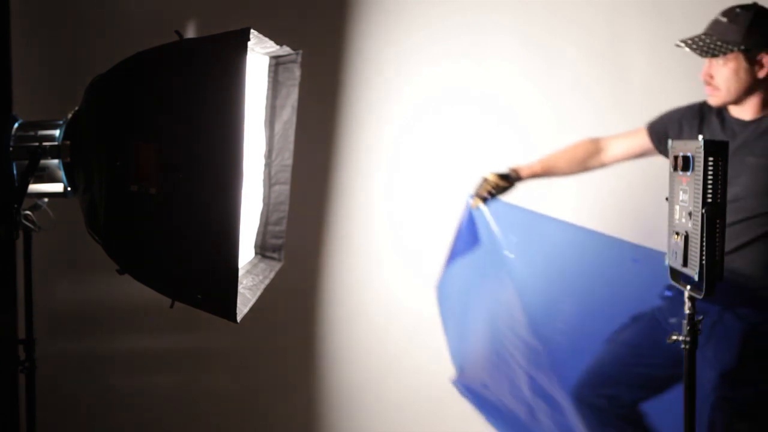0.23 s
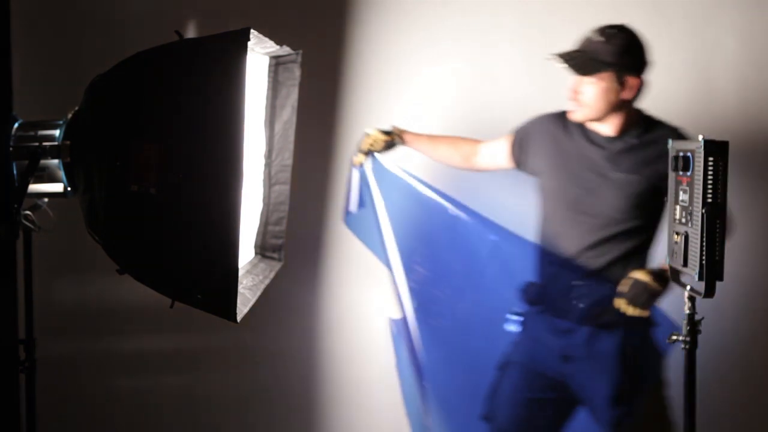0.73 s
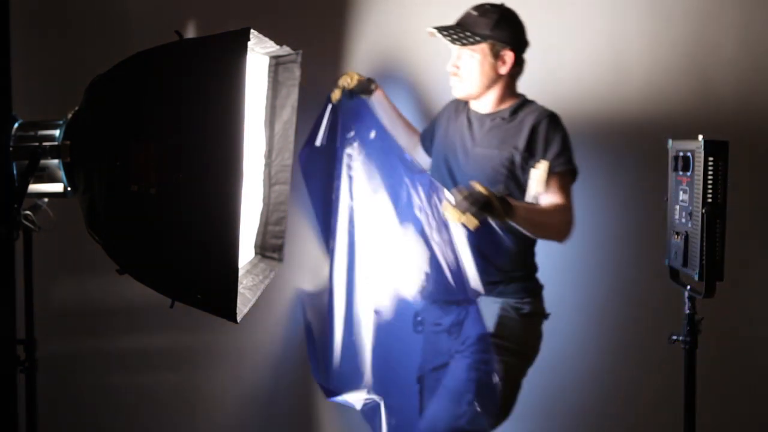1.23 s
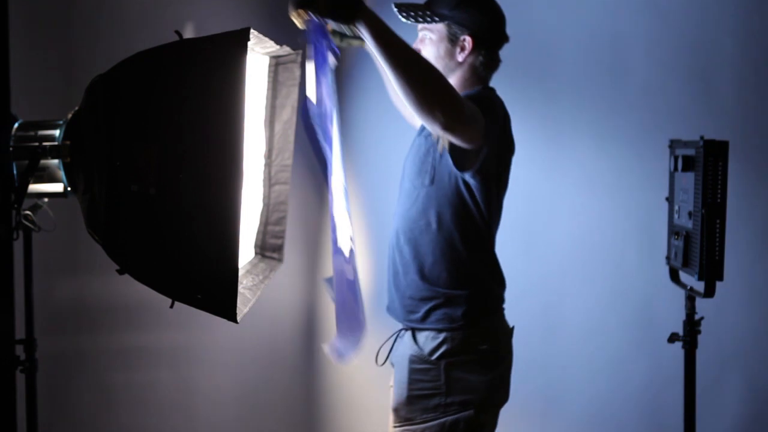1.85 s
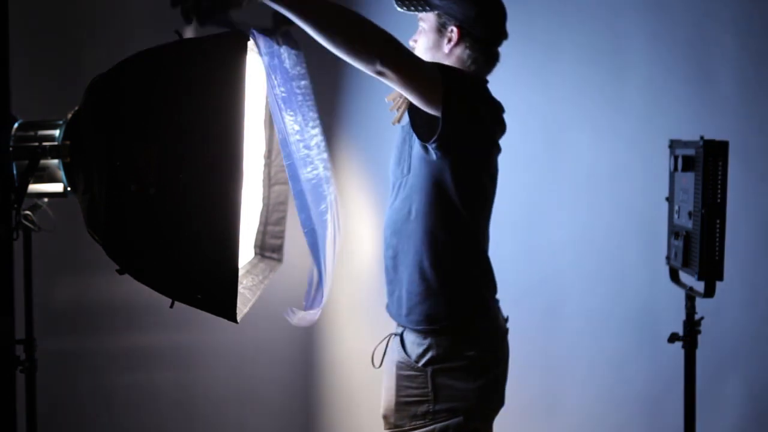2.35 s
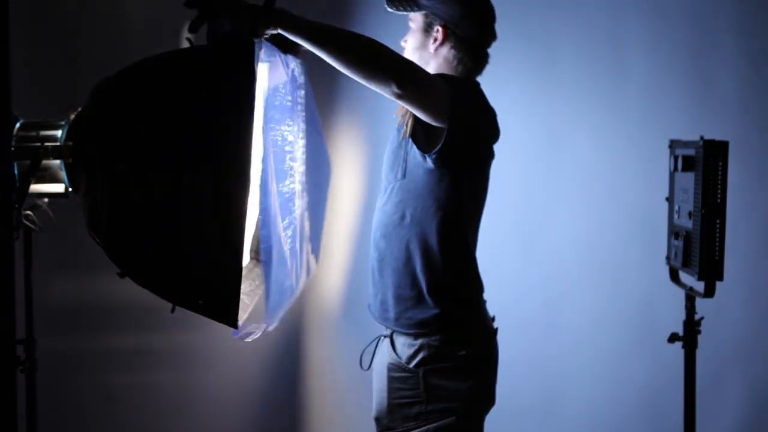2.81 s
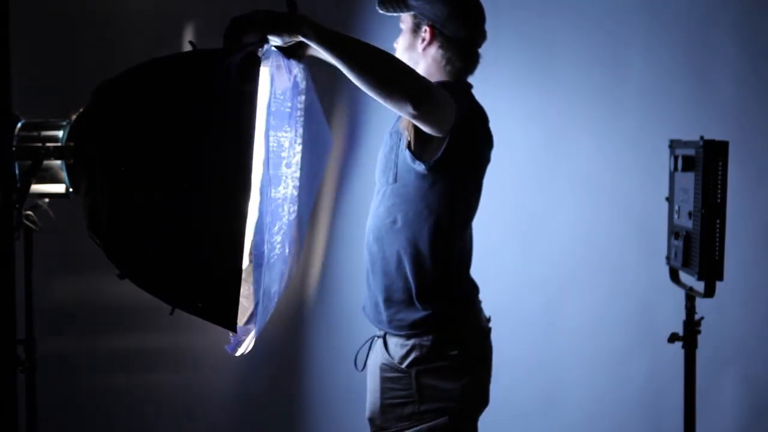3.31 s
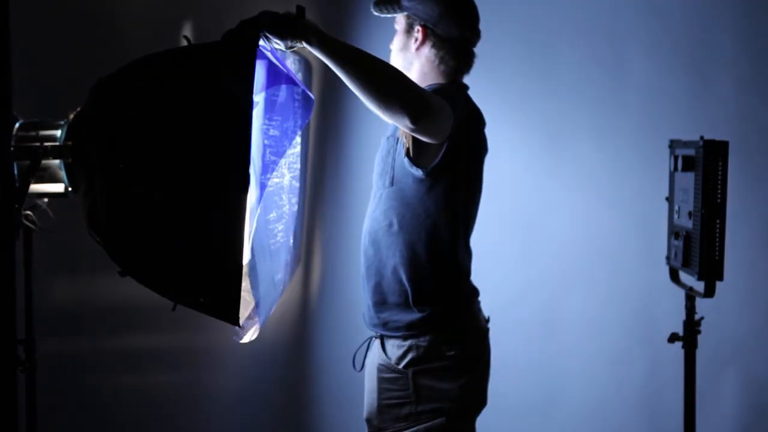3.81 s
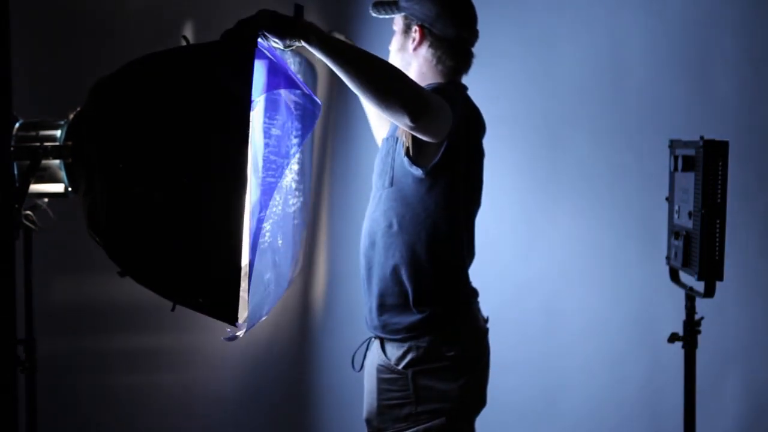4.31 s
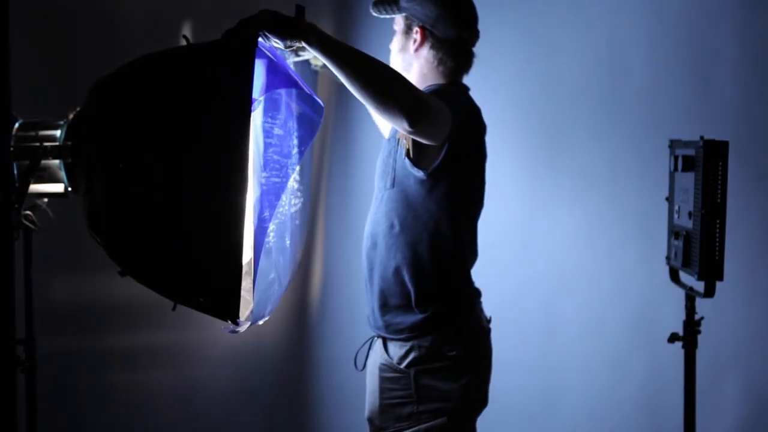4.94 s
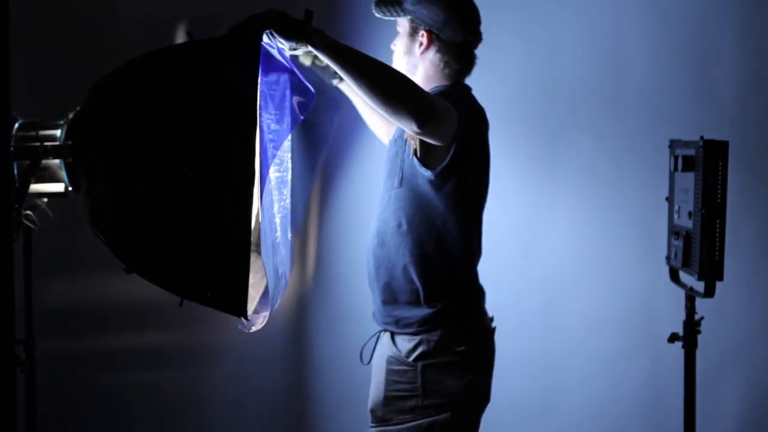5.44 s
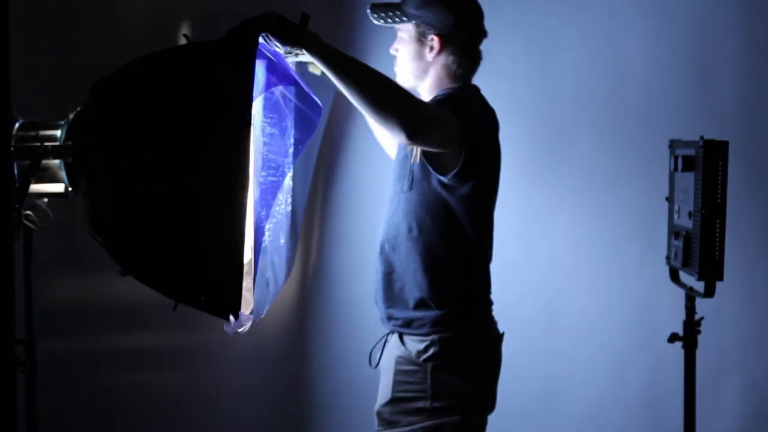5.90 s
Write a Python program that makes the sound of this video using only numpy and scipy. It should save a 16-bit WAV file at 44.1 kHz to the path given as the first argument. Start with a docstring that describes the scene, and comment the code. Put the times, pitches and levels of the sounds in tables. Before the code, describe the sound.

A large stiff plastic film sheet is handled in a bare studio with short, lively echoes, heard by one fairly close microphone. It starts with quiet rustling and small ticks; at 0.3-0.6 s a soft hissing slide leads into the fullest crackling rumple, about 0.7-1.1 s, with a dull footfall near 0.65. Crisp snaps and collapsing folds follow at 1.25 and 1.5, with a barely audible step. A duller, billowing swing swells toward 2.4, then sharp crackles cluster around 2.9, 3.2 and 3.4-3.6. Handling thins after 3.8, leaving an isolated snap at 4.25 and a lull. A fresh crinkling burst begins about 4.85, with pops until 5.4, then softer rustles and faint ticks to about 6.1. Throughout there is soft still-air noise and a faint low engine hum through the wall, idling first, climbing in pitch from about 2 s and more noticeable later.

```python
"""In a bare studio a large sheet of stiff plastic film is carried across and held against a lamp.
Its panels flex, its creases crackle, snap and collapse, and it slides over itself: random slips, each
filtered or ringing at a pitch and returned by the room. A foot excites the damped modes of the floor.
Outside an eight-cylinder engine idles and then gathers speed: harmonics of its cycle, a faint hum
through the wall. Filtered noise forms the still air."""
import sys
import numpy as np
from scipy import signal
from scipy.fft import rfft, irfft, next_fast_len
from scipy.io import wavfile

SR = 44100
rng = np.random.default_rng(int(sys.argv[2]) if len(sys.argv) > 2 else 0)


def wav_out(sig):
    """Save sig, one row per channel (or a flat mono array), as 16-bit PCM at SR to the path in sys.argv[1]."""
    wavfile.write(sys.argv[1], SR, np.round(np.clip(np.atleast_2d(sig).T, -1, 1) * 32767).astype(np.int16))


N = 271778


# Spectra of the flexing, crackling and sliding sheet.
# Each row: frequency in Hz, filter gain in dB.
FLEX_SPECTRUM = [(120, -37.5), (250, -14.5), (350, -13.5), (480, -6.5), (700, -3), (1000, 3), (1350, 2),
                 (1750, 1), (2200, -4.5), (3000, -18), (5000, -52)]
CRACKLE_SPECTRUM = [(1000, -17.5), (2100, 0), (2900, 5.5), (3600, 2), (5400, -3.5), (6600, -10),
                    (8500, -35), (12000, -61)]
SLIDE_SPECTRUM = [(2000, -68), (4500, -8), (6300, 0.5), (7700, 4), (8400, -0.5), (9300, -7), (10500, -13.5),
                  (11700, -18), (12500, -53)]
# the whole sheet billows with the square of the flexing, so chiefly in the hardest swing
BILLOW_DB, BILLOW_LOW_HZ, BILLOW_HIGH_HZ = -39, 340, 610


def rustle():
    """Superposition: broad panels rumple dully, small creases crackle, film rubbing on film hisses."""
    flexing, crackling, sliding = effort()
    panels = buckles(per_s=3000, spread_db=3, clump_db=1.5, low_hz=262, high_hz=3200, cycles=4.9)
    creases = buckles(per_s=1000, spread_db=4, clump_db=3.5, low_hz=1740, high_hz=10900, cycles=6.4)
    rubbing, flapping = rng.standard_normal((2, N))

    flex = from_db(1.5) * flexing * rms_one(colour(panels, FLEX_SPECTRUM))
    swing = (flexing / flexing.max()) ** 2
    billow = from_db(BILLOW_DB) * swing * rms_one(band(flapping, BILLOW_LOW_HZ, BILLOW_HIGH_HZ))
    crackle = crackling * (rms_one(colour(creases, CRACKLE_SPECTRUM)) + ticks())
    slide = from_db(1) * sliding * rms_one(colour(creases + rubbing, SLIDE_SPECTRUM))

    dull = studio(flex + billow, near_db=-0.5, hall_db=-3.5)
    bright = studio(crackle + slide, near_db=7.5, hall_db=0.5)
    return dull + bright


# The hands move the sheet. Each row: start in seconds, rise in seconds, hold in seconds,
# then the relative levels of flexing, crackling and sliding in dB.
MOVES = [(-0.03, 0.037, 0.27, -37, -46.5, -55), (0.275, 0.28, 0.15, -37, -41, -35),
         (0.614, 0.33, 0.1, -25, -27, -40), (1.17, 0.03, 0.21, -31, -32, -44),
         (1.507, 0.023, 0.18, -41, -40, -47), (1.91, 0.067, 0.03, -39, -31, -35),
         (1.97, 0.39, .05, -29.5, -40, -58), (2.279, 0.029, 0.12, -39, -30, -43.5),
         (2.54, 0.079, 0.078, -40, -32.5, -41), (2.804, 0.092, 0.11, -35, -30.5, -39),
         (3.08, 0.064, 0.33, -41, -36.5, -37), (3.356, 0.065, 0.21, -31, -31, -39),
         (3.706, 0.063, 0.074, -33.5, -35, -50), (4.234, .012, 0.045, -47, -41.5, -41),
         (4.676, 0.044, 0.037, -47, -49, -49), (4.83, 0.089, 0.56, -32, -34, -43),
         (5.5, .13, 0.029, -36.5, -44.5, -63), (5.917, 0.041, 0.23, -45, -49.5, -50.5)]
# how fast the sheet settles after a move
FLEX_DB_PER_S, CRACKLE_DB_PER_S, SLIDE_DB_PER_S = 36, 67, 100


def effort():
    """Energy addition: each move swells, holds and dies away exponentially, and their powers add."""
    t = np.arange(0, N + 100, 100) / SR  # a coarse grid, interpolated below
    settling = np.array([[FLEX_DB_PER_S], [CRACKLE_DB_PER_S], [SLIDE_DB_PER_S]])
    power = 0
    for start, rise, hold, *levels_db in MOVES:
        swell = np.clip((t - start) / rise, 0, 1)
        since_end = np.maximum(t - start - rise - hold, 0)
        gains = swell * from_db(np.c_[levels_db] - settling * since_end)
        power = power + gains ** 2
    return in_time(np.c_[t, np.sqrt(power).T])


def buckles(per_s, spread_db, clump_db, low_hz, high_hz, cycles, count=18):
    """Random buckling: facets of the film pop in clumps, each ringing a few cycles at its own pitch."""
    rate = per_s * from_db(clump_db * drift(60))
    born = rng.random(N) < rate / SR
    sizes = from_db(spread_db * np.minimum(rng.exponential(1, N), 4)) * rng.choice([-1, 1], N)
    pops, dealt = born * sizes, rng.integers(0, count, N)
    total = 0
    for k, hz in enumerate(np.geomspace(low_hz, high_hz, count)):
        # small facets move faster, which keeps the spectrum flat
        total = total + hz * ring(pops * (dealt == k), hz, cycles / hz)
    return rms_one(total)


# level relative to the crackling
TICKS_PER_S, TICKS_DB, TICK_HZ = 25, -10.5, 5600


def ticks():
    """A Poisson process: lone small creases flip at random moments."""
    flips = (rng.random(N) < TICKS_PER_S / SR) * rng.standard_normal(N)
    return from_db(TICKS_DB) * rms_one(colour(fold(flips + 1e-18, TICK_HZ), SNAP_SPECTRUM))


# Creases give way.
# Each row: start in seconds, level in dB over the first 6 ms before colouring, pitch in Hz.
SNAPS = [(0.051, -39.5, 4130), (0.195, -37.5, 3770), (0.268, -31.5, 3200), (0.718, -26, 3940),
         (0.876, -21, 3700), (0.896, -24, 7060), (0.945, -22.5, 3270), (1.092, -35, 4750),
         (1.226, -27, 4180), (1.246, -18, 5030), (1.427, -34, 5250), (1.4966, -19.5, 6000),
         (1.501, -18, 6300), (2.115, -35.5, 4850), (2.304, -27, 3530), (2.359, -22.5, 5400),
         (2.9185, -15.5, 4240), (3.164, -18, 5070), (3.424, -18.5, 4730), (3.547, -14.5, 4700),
         (3.888, -35.5, 4730), (4.251, -21.5, 4000), (4.835, -34, 2500), (4.86, -22.5, 4130),
         (4.894, -18.5, 5500), (4.973, -25.5, 4770), (5.168, -20, 5150), (5.365, -19.5, 4400),
         (5.666, -34, 4330), (5.951, -32.5, 5860), (6.013, -35, 5000), (6.09, -42.5, 4860)]
# Spectrum of a flipping crease, shared by snaps, crumples and ticks.
# Each row: frequency in Hz, filter gain in dB.
SNAP_SPECTRUM = [(200, -21), (500, 3), (1000, 14.5), (2000, 1.5), (3200, 1), (5500, 0.5), (8000, 3),
                 (9300, -3), (11000, -7.5), (12300, -54)]
SNAP_LENGTH_S = 0.0012  # decay time constant of the slips


def snaps(slips_per_s=11000):
    """Snap-through: a crease flips with a sharp crack and a dying run of slips along the fold."""
    out, t = np.zeros(N + SR), np.arange(SR // 20) / SR
    for s, level_db, hz in SNAPS:
        slips = (rng.random(len(t)) < slips_per_s / SR) * rng.standard_normal(len(t))
        slips *= np.exp(-t / SNAP_LENGTH_S)
        slips[0] = rng.choice([-1, 1])  # the flip itself
        heard = echoes(near_db=3, hall_db=-1, near_t60=0.036)
        heard[:len(t)] += slips / np.linalg.norm(slips)
        crack = fold(heard, hz, width=1.754)
        attack = crack[:int(.006 * SR)]
        at = int(s * SR)
        out[at:at + len(crack)] += from_db(level_db) * crack / np.std(attack)
    return colour(out[:N], SNAP_SPECTRUM)


# Whole folds collapse. Each row: time of the height in seconds,
# level in dB around the height before colouring, pitch in Hz, half-length in seconds.
CRUMPLES = [(0.734, -28, 2770, 0.016), (0.82, -23, 2800, 0.0054), (1.035, -23.5, 1960, 0.0078),
            (1.256, -18, 2660, 0.0096), (1.457, -30.5, 1940, 0.016), (2.372, -33.5, 2242, 0.015),
            (2.904, -23.5, 6200, 0.0064), (2.943, -19.5, 3650, 0.0062), (3.425, -20, 3180, 0.0041),
            (3.484, -20.5, 4540, 0.0089), (3.549, -19, 2970, 0.008), (3.788, -28.5, 2880, .008),
            (4.886, -23.5, 3200, .023), (5.281, -27, 4020, 0.012), (5.375, -25, 3340, 0.0094),
            (5.657, -35, 2160, 0.017)]


def crumples(slips_per_s=2000, spread_db=4):
    """Avalanche: one crease sets off the next, and a brief burst of slips swells and is spent."""
    out, t = np.zeros(N + SR), np.arange(-(SR // 10), SR // 10) / SR
    for s, level_db, hz, half_length in CRUMPLES:
        sizes = from_db(spread_db * np.minimum(rng.exponential(1, len(t)), 3))
        sizes *= rng.choice([-1, 1], len(t))
        swell = np.exp(-.5 * (t / half_length) ** 2)
        slips = sizes * (rng.random(len(t)) < slips_per_s / SR) * swell
        heard = signal.fftconvolve(slips, echoes(near_db=-4, hall_db=-6, near_t60=0.13))
        heard[:len(t)] += slips
        burst = fold(heard, hz)
        height = burst[:len(t)][np.abs(t) < half_length]
        at = int((s + t[0]) * SR)
        out[at:at + len(burst)] += from_db(level_db) * burst / np.std(height)
    return colour(out[:N], SNAP_SPECTRUM)


def fold(slips, hz, width=2.008, body_db=-14):
    """Resonance: the fold sets the pitch of its slips, the whole sheet answers more broadly."""
    return band(slips, hz / width, hz * width) + from_db(body_db) * slips


# Footfalls. Each row: start in seconds, relative strength of the blow in dB.
STEPS = [(0.635, -19.5), (1.556, -39)]
# Modes of the floor boards. Each row: frequency in Hz, relative level in dB, t60 in seconds.
BOARDS = [(165, -16, 0.11), (242, 0, 0.092), (291, 2.5, 0.14), (413, 0, 0.052), (514, 15, 0.019)]


def footfalls():
    """Modal excitation: the impulse of a heel sets the floor boards ringing briefly."""
    heels = np.zeros(N)
    for s, strength_db in STEPS:
        heels[int(s * SR)] = from_db(strength_db)
    modes = sum(from_db(db) * ring(heels, hz, t60) for hz, db, t60 in BOARDS)
    thud = from_db(-18.5) * modes
    return thud + signal.oaconvolve(thud, echoes(near_db=0, hall_db=-5.5))[:N]


# Engine speed. Each row: time in seconds, four-stroke cycles per second.
ENGINE_SPEED = [(0, 12.5), (.75, 12.5), (1.3, 11.9), (1.8, 12.05), (2.3, 13), (3, 14.5), (3.5, 15.6),
                (4, 16.9), (5, 19.8), (6.16, 23.1)]
# Engine load. Each row: time in seconds, relative level of the hum in dB.
ENGINE_LOAD = [(0, -48), (1, -51), (2.5, -38.5), (3.1, -38), (3.5, -44), (3.8, -42), (4.3, -35.5),
               (4.66, -32), (4.71, -40.5), (5.1, -35), (5.7, -34), (6.16, -38.5)]
# Engine orders. Each row: multiple of the cycle rate, relative level in dB.
ENGINE_ORDERS = [(4, 5), (5, -5.5), (7, -4.5), (8, -0.5), (9, -0.5), (11, -3), (12, 4.5), (16, -13)]
# What the wall and the low room modes let through. Each row: frequency in Hz, gain in dB.
WALL = [(45, -42), (56, -18.5), (67, -7), (80, -22), (95, -12.5), (108, -3), (119, -2), (130, -3),
        (145, -8), (170, -33.5), (202, -15.5), (240, -26.5), (370, -7)]


def engine(waver=0.0011):
    """Harmonic series: the orders follow the speed and swell as each crosses a low room mode."""
    (speed,), (load_db,) = in_time(ENGINE_SPEED), in_time(ENGINE_LOAD)
    phase = 2 * np.pi * np.cumsum(speed * (1 + waver * drift(4.2))) / SR
    hum = 0
    for multiple, db in ENGINE_ORDERS:
        k = round(multiple)
        gain = from_db(db + at_hz(WALL, k * speed))
        hum += gain * np.sin(k * phase + 2 * np.pi * rng.random())
    return from_db(load_db) * hum


# Spectrum of the still air in the studio. Each row: frequency in Hz, filter gain in dB.
AIR_SPECTRUM = [(20, -28), (45, -5.5), (70, -10), (130, -2), (200, -5.5), (350, -14), (800, -13.5),
                (2000, -25.5), (7500, -21.5), (10000, -33), (12000, -42)]
AIR_DB = -46.5  # rms level


def still_air():
    """Stationary noise: white noise shaped to the spectrum of the quiet room."""
    return from_db(AIR_DB) * rms_one(colour(rng.standard_normal(N), AIR_SPECTRUM))


def studio(x, near_db, hall_db, count=7):
    """Spatial diversity: the sound wanders over the sheet, and each spot has echoes of its own."""
    spot = np.arange(N) / SR / .012 % count  # 12 ms from spot to spot
    out = x.copy()
    for k in range(count):
        share = np.maximum(1 - np.abs((spot - k + 1) % count - 1), 0)  # crossfade of neighbours
        out += signal.oaconvolve(x * share, echoes(near_db, hall_db))[:N]
    return out * np.std(x) / np.std(out)


# Reverberation of the studio. Each row: frequency in Hz, t60 in seconds.
STUDIO_T60 = [(150, 0.35), (500, 1), (1300, 0.7), (3500, 0.59), (7000, 0.43), (11000, 0.11)]


def echoes(near_db, hall_db, near_t60=0.14, count=4):
    """Exponential decay: quick scatter off things nearby, then a tail that dies by band."""
    t = np.arange(int(.6 * SR)) / SR
    edges = np.geomspace(300, 14000, count + 1)
    white = rng.standard_normal((2, len(t)))
    tail = 0
    for k, (low, high) in enumerate(zip(edges, edges[1:])):
        t60 = at_hz(STUDIO_T60, np.sqrt(low * high))
        tail = tail + band(white[k % 2], low, high) * np.exp(-np.log(1000) * t / t60)
    scatter = rng.standard_normal(len(t)) * np.exp(-np.log(1000) * t / near_t60)
    arriving = np.clip(t / 0.0024 - .5, 0, 1)  # a short gap, then a fade-in
    mixed = from_db(near_db) * rms_one(scatter) + from_db(hall_db) * rms_one(tail)
    return arriving * mixed / np.sqrt(len(t))


def ring(clicks, hz, t60):
    """Damped resonator: a unit click sets off a decaying sine of initial height one."""
    r, w = np.exp(-np.log(1000) / (t60 * SR)), 2 * np.pi * hz / SR
    return signal.lfilter([0, np.sin(w)], [1, -2 * r * np.cos(w), r * r], clicks + 1e-18)


def colour(x, spectrum):
    """Minimum phase: a causal filter with the given spectrum, by folding its cepstrum."""
    size = 2 * next_fast_len(N // 2 + SR // 10)
    gain = from_db(at_hz(spectrum, np.fft.rfftfreq(size, 1 / SR)))
    cepstrum = irfft(np.log(gain))
    cepstrum[1:size // 2] *= 2
    cepstrum[size // 2 + 1:] = 0
    return irfft(rfft(x, size) * np.exp(rfft(cepstrum)))[:N]


def band(x, low_hz, high_hz):
    """Band limitation: a Butterworth band-pass."""
    sos = signal.butter(2, [low_hz, high_hz], "band", fs=SR, output="sos")
    return signal.sosfilt(sos, x)


def drift(rate):
    """Slow random modulation: chance values, rate per second, joined by lines, with an rms of one."""
    knots = np.arange(N) / SR * rate
    return rms_one(np.interp(knots, np.arange(N), rng.standard_normal(N)))


def in_time(rows):
    """Linear interpolation: each column of a curve at every sample."""
    s, *columns = np.transpose(rows)
    return [np.interp(np.arange(N) / SR, s, c) for c in columns]


def at_hz(points, hz):
    """Logarithmic pitch: read a spectrum on a log-frequency axis."""
    f, value = np.transpose(points)
    return np.interp(np.log(np.maximum(hz, 1)), np.log(f), value)


def from_db(db):
    """The decibel: a level as an amplitude gain."""
    return 10 ** (np.asarray(db) / 20)


def rms_one(x):
    """Effective value: scale to an rms of one."""
    return x / np.sqrt(np.mean(x ** 2) + 1e-20)


def scene():
    """Superposition: all sources add at one microphone, the same in both channels."""
    sheet = rustle() + snaps() + crumples()
    return np.tile(sheet + footfalls() + engine() + still_air(), (2, 1))


CUTOFF_HZ = 11900


def record(dry):
    """Saturation and band limit: the highest peaks are rounded and the top is cut."""
    rounded = .7 * np.tanh(dry / .7)
    low_pass = signal.ellip(10, .2, 90, CUTOFF_HZ, fs=SR, output="sos")
    return signal.sosfilt(low_pass, rounded)


dry = scene()
out = record(dry)
wav_out(out)
```